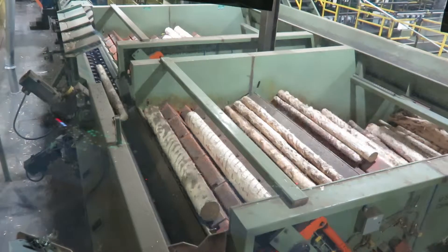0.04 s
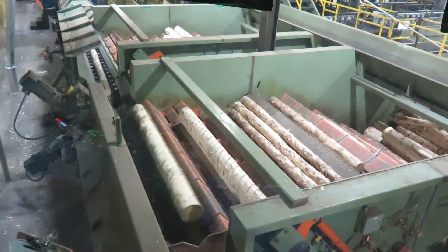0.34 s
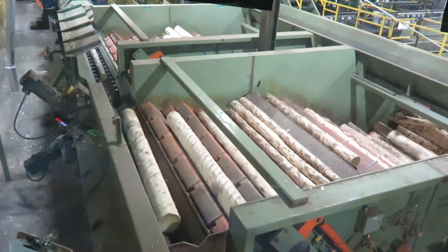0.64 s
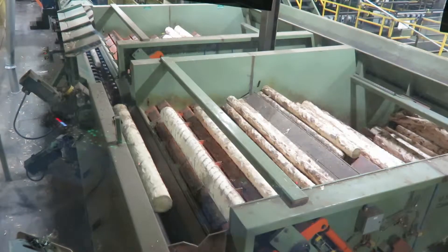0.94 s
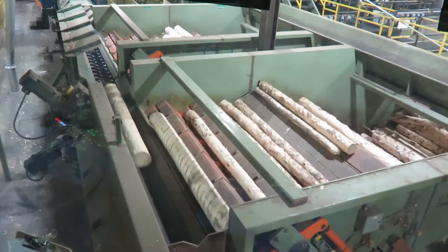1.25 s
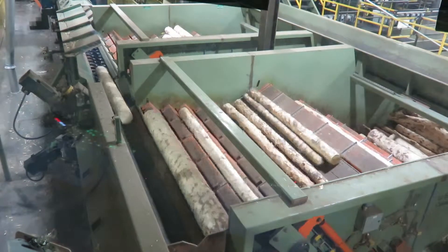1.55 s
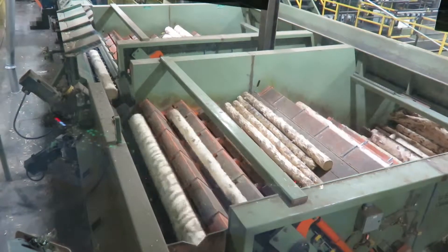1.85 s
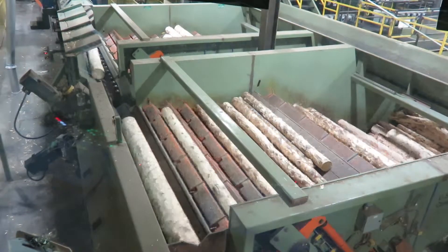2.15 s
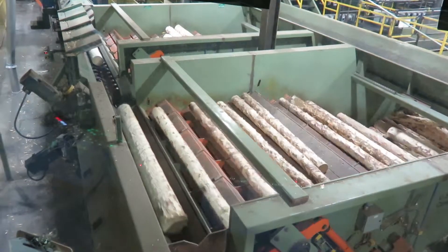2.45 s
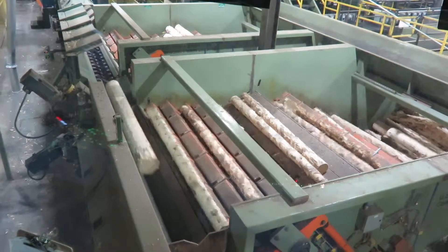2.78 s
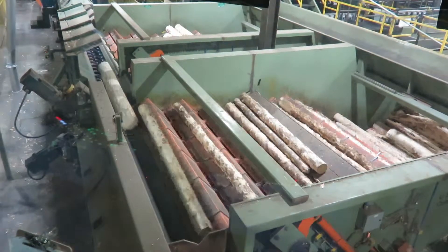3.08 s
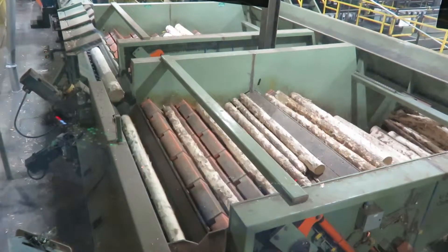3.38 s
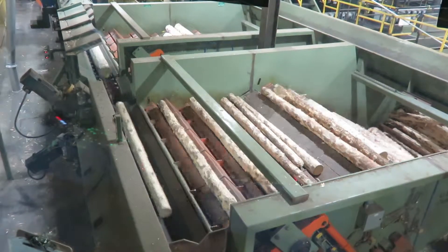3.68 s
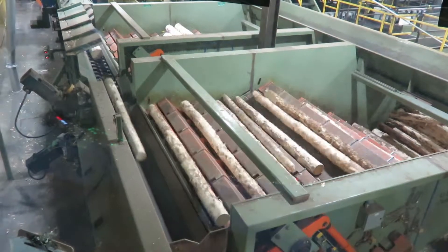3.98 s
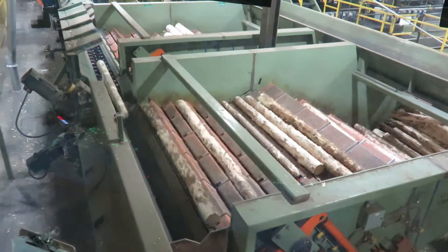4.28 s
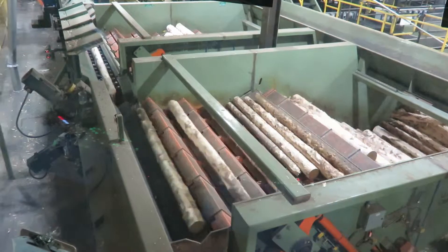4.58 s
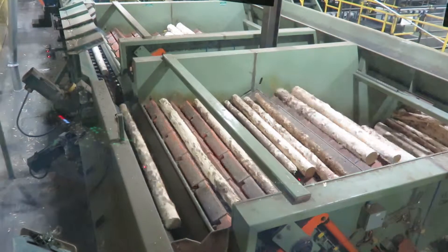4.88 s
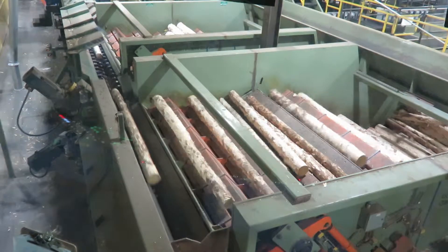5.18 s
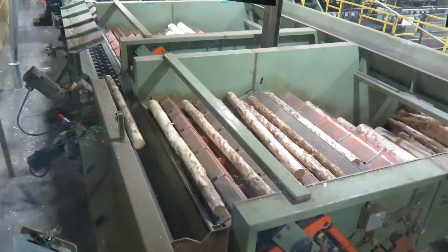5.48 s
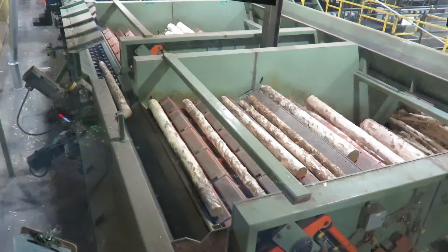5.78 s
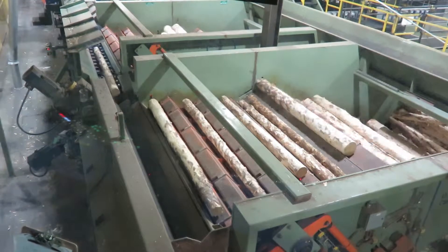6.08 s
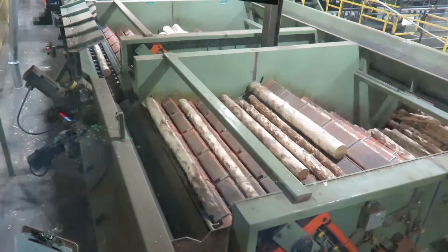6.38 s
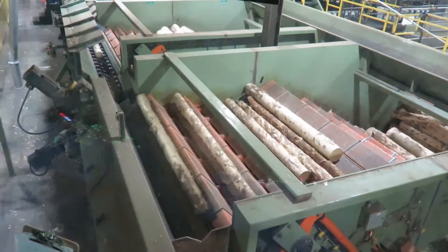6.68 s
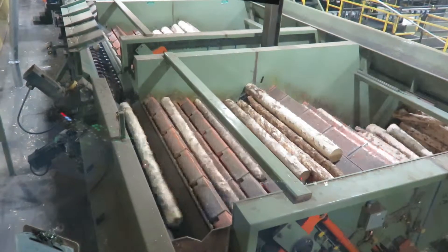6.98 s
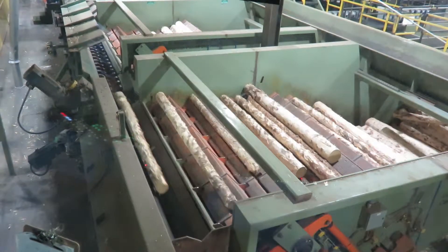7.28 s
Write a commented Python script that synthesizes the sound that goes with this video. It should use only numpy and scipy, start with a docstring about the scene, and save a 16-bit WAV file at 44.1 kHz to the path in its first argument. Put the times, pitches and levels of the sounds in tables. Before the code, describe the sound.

Sawmill machinery rumbles steadily while logs roll and thud in a steel feeder bin and a cutter roars in surges.

```python
"""A steel frame rumbles and logs roll and thud in a bin, in a large, echoing sawmill hall.
A step feeder is lifting them onto a chain conveyor, heard through a close pair of microphones.
Down the line a cutter roars each time it takes a log; its shaft throbs and its head whines under load.
Logs scrape along the trough, and the chain clacks and squeaks now and then.
A few thin ticks sound in the treble, and after each the level dips briefly."""
import sys
import numpy as np
from scipy import signal
from scipy.fft import rfft, irfft
from scipy.io import wavfile
from scipy.ndimage import uniform_filter1d

SR = 44100
rng = np.random.default_rng(int(sys.argv[2]) if len(sys.argv) > 2 else 0)


def digitize_waveform(pressure):
    """Quantize a signal to 16-bit integers and store it at the path in sys.argv[1].

    Rows of a 2-D input are taken as channels; values are limited to [-1, 1].
    """
    field = np.atleast_2d(pressure).T
    bounded = np.clip(field, -1, 1)
    quanta = np.round(bounded * 32767).astype(np.int16)
    wavfile.write(sys.argv[1], SR, quanta)


N = 332514
TIME = np.arange(N) / SR
BINS = np.fft.rfftfreq(N, 1 / SR)
CLOCK = np.arange(0, N / SR, .002)  # coarse time for the envelopes, in seconds

# Resonances of the bin walls, logs and steel plates. Each row: pitch in Hz, width in Hz, relative dB.
WALL_MODES = [(118.3, 9.7, -1.5), (143.1, 12.3, 4.5), (161.4, 6.1, 4), (177.3, 13, 3), (201, 8.8, -5.5)]
LOG_MODES = [(236.4, 12.2, 2), (256, 17, -5.5), (279, 24, -2.5), (327, 31, -6.5), (371, 46, -13.5)]
PLATE_MODES = [(401, 238, 0), (472, 20, -0.5), (534, 47, -0.5), (660, 69, -7), (827, 77, -8)]
# Balance at the microphones. Each row: frequency in Hz, left minus right in dB.
BALANCE = [(60, .2), (125, -.3), (250, -1.4), (500, -1.1), (2000, -.4), (12000, -.4)]
# Thin ticks. Each row: time in seconds, peak in dB, dip that follows in dB.
TICKS = [(.6345, -49, -1.5), (.7573, -42, -2), (2.3426, -42.5, -3), (5.5305, -47, -2), (6.6015, -49, -1),
         (7.4885, -51, -1)]


def gain_of(db):
    """Decibels to amplitude."""
    return 10 ** (np.asarray(db) / 20)


def unit_rms(x):
    """Scales to rms 1."""
    return x / np.sqrt(np.mean(x ** 2) + 1e-20)


def db_at(points, hz):
    """Reads a table of levels on a log-frequency axis."""
    f, db = np.transpose(points)
    return np.interp(np.log(hz + 1), np.log(f + 1), db)


def follow(rows):
    """Each column of a table of curves, at every sample."""
    times, *columns = np.transpose(rows)
    return [np.interp(TIME, times, column) for column in columns]


def add(mix, start, sound):
    """Mixes in a stereo sound, its start given in seconds."""
    part = mix[:, max(round(start * SR), 0):][:, :sound.shape[1]]
    part += sound[:, :part.shape[1]]


def drift(rate_hz):
    """Random wander of rms 1, mostly slower than the given rate."""
    hz = np.fft.rfftfreq(len(CLOCK), CLOCK[1])
    spectrum = rfft(rng.standard_normal(len(CLOCK))) / (1 + (hz / rate_hz) ** 4)
    return np.interp(TIME, CLOCK, unit_rms(irfft(spectrum, len(CLOCK))))


def grain(size, span):
    """Noise of rms 1, smoothed over span points."""
    return unit_rms(uniform_filter1d(rng.standard_normal(size), span))


def ringing(modes, hz):
    """Gain of a set of resonances with steep skirts."""
    return np.sqrt(sum((gain_of(db) / (1 + ((hz - f) / width) ** 2)) ** 2 for f, width, db in modes))


def diffuse(colour, size=N):
    """Coloured noise of rms 1 at two close microphones: alike in the bass, unlike in the treble."""
    # Width of the pair. Each row: frequency in Hz, side relative to mid in dB.
    spread = [(25, -38), (60, -32), (125, -25), (250, -18.3), (500, -16), (1000, -10.4), (2000, -10.5),
              (4000, -5.6), (8000, -1), (14000, -1.2)]
    hz = np.fft.rfftfreq(size, 1 / SR)
    mid, side = rfft(rng.standard_normal((2, size)))
    side *= gain_of(db_at(spread, hz))
    lean = gain_of(db_at(BALANCE, hz) / 2)
    pair = np.array([(mid + side) * lean, (mid - side) / lean])
    return unit_rms(irfft(pair * colour, size))


def steadied(x, span_s):
    """Holds the power of a vibration even over the given span."""
    power = uniform_filter1d((x ** 2).mean(0), int(span_s * SR) + 1)
    power = uniform_filter1d(power, int(span_s * SR / 2) + 1)
    return unit_rms(x / np.sqrt(power + 1e-9))


def blow(t, rise_s, t60):
    """Envelope of a hit: a quick rise, then a decay of 60 dB in t60 seconds."""
    return (1 - np.exp(-t / rise_s)) * gain_of(-60 * t / t60)


def passing(start, length, rise_s, fade_db_per_s):
    """Envelope of a moving log: it builds up, holds, and dies away in the hall."""
    t = CLOCK - start
    return np.sqrt(np.clip(t / rise_s, 0, 1)) * gain_of(-fade_db_per_s * np.maximum(t - length, 0))


def summed_db(gains, base_db):
    """Level in dB, at every sample, of a base plus unrelated sounds on top of it."""
    power = np.interp(TIME, CLOCK, sum(gain ** 2 for gain in gains))
    return 10 * np.log10(gain_of(base_db) ** 2 + power)


def hall_tone(hz, db, wander_rad):
    """A steady tone whose phase wavers on its way through the hall to the microphones."""
    phase = 2 * np.pi * hz * TIME + wander_rad * drift(rate_hz=2.34)
    apart = .18 * np.sqrt(hz / 500) * np.array([[.5], [-.5]])
    return np.sqrt(2) * gain_of(db) * np.sin(phase + apart)


def feeder(load_db):
    """The drive shakes the frame; rolling logs boom, knock and rattle plates the cutter shakes too."""
    # Resonances of the frame. Each row: pitch in Hz, width in Hz, relative dB.
    frame_modes = [(55.9, 4.6, -2.5), (75.4, 7.5, -4.5), (101.3, 12.7, -12)]
    # Effort of the drive. Each row: time in seconds, shaking of the frame in dB.
    drive = [(0, -17.5), (1.1, -19.5), (2.3, -17.5), (3.25, -20), (4.1, -17.5), (4.8, -22), (5.3, -18.5),
             (5.9, -22), (6.6, -19.5), (7.0, -24), (7.54, -18)]
    # Logs rolling down a step. Each row: start and length in seconds, then the boom of the bin walls,
    # the knock of wood and the clatter of plates in dB.
    log_rolls = [(-.05, 0.091, -15, -18.5, -34), (0.33, 0.1, -23, -21, -27), (0.512, 0.24, -19.5, -20, -24),
                 (1.56, 0.33, -28, -22, -28.5), (2.076, 0.25, -29, -21, -34),
                 (2.473, 0.18, -24, -21.5, -35), (2.823, 0.28, -28, -22, -29), (3.21, 0.48, -23, -25, -34),
                 (3.845, 0.2, -23, -27.5, -37), (4.072, 0.41, -22.5, -21.5, -32.5),
                 (4.653, 0.58, -42, -27.5, -44), (5.283, .24, -38, -28, -25), (5.436, 0.3, -22, -24, -29),
                 (5.999, 0.71, -23.5, -39.5, -38), (6.35, 0.27, -23, -23, -34),
                 (6.636, 0.24, -28, -20, -31.5), (7, .15, -23, -28, -29.5), (7.388, .17, -25, -21, -28.5)]
    rolls = [passing(start, length, rise_s=.027, fade_db_per_s=72) * gain_of(levels)[:, None]
             for start, length, *levels in log_rolls]
    booms, knocks, clatters = zip(*rolls)
    parts = [(frame_modes, follow(drive)[0]),
             (WALL_MODES, summed_db(booms, base_db=-22)),  # logs keep shifting between rolls
             (LOG_MODES, summed_db(knocks, base_db=-25.5)),
             (PLATE_MODES, summed_db(clatters, base_db=-13 + .48 * load_db))]
    out = np.zeros((2, N))
    for modes, db in parts:
        level = gain_of(db + .4 * drift(rate_hz=12))
        out += level * steadied(diffuse(ringing(modes, BINS)), span_s=.1)
    return out


def cutter_load():
    """Roar and chip levels in dB: each log bites in, loads the knives as its girth changes, and leaves."""
    # Logs in the cutter. Each row: start and length in seconds, final roar and final hiss in dB,
    # climb of the roar in dB per second.
    cuts = [(-.4, 1.01, -28.5, -49, -4.5), (1.135, 1.06, -27, -49, 3), (2.352, 0.33, -37, -54, 2),
            (2.65, 2.01, -27, -49.5, 1.4), (4.616, 0.9, -26, -48.5, 8), (6.0, 0.76, -32.5, -50.5, -0.5),
            (6.747, 0.19, -37, -69, 0), (7.22, 0.34, -36.5, -56, -1)]
    bite_s, idle_roar_db, idle_chips_db = .26, -36, -69
    roar, chips = [], []
    for start, length, roar_db, chips_db, climb in cuts:
        girth_db = climb * np.clip(CLOCK - start - length, -length, 0)
        # The hall holds the roar longer than the hiss.
        roar.append(passing(start, length, bite_s, fade_db_per_s=42) * gain_of(roar_db + girth_db))
        chips.append(passing(start, length, bite_s, fade_db_per_s=58) * gain_of(chips_db + .45 * girth_db))
    return summed_db(roar, idle_roar_db), summed_db(chips, idle_chips_db)


def cutter(load_db, hiss_db):
    """Down the line, knives tear the wood with a fluttering roar, and chips hiss down the chute."""
    # Spectra of the roar and the chips. Each row: frequency in Hz, relative dB.
    roar_spectrum = [(200, 9), (400, -17), (600, 8), (800, -1), (1000, 2.5), (1250, -0.5), (1900, -1),
                     (2400, -3), (2900, -8.5), (3600, -16.5), (5000, -28), (9000, -61.5)]
    chip_spectrum = [(2000, -16), (3500, 4.5), (4500, 4.5), (5800, 2), (7000, -4.5), (8300, -8.5),
                     (10500, -11.5), (13500, -17), (15500, -21)]
    roar = diffuse(gain_of(db_at(roar_spectrum, BINS))) * gain_of(load_db + .56 * drift(rate_hz=21))
    chips = diffuse(gain_of(db_at(chip_spectrum, BINS))) * gain_of(hiss_db + .5 * drift(rate_hz=100))
    return roar + chips


def motors():
    """The unbalanced shaft throbs, the drive drones, the cutter head whines, and far machines whistle."""
    # Throb of the shaft. Each row: time in seconds, relative dB.
    throb = [(0.0, -30), (0.33, -21), (1.8, -31), (1.85, -46), (2.16, -18), (2.48, -28.5), (5.42, -21),
             (5.63, -37), (6.22, -29), (7.54, -25)]
    # Whine of the head. Each row: time in seconds, then harmonics one to three in dB.
    whine = [(0, -24, -41, -45), (.6, -37, -30, -37), (.85, -33, -32.5, -48), (1.3, -30.5, -40.5, -57),
             (2.0, -41, -32, -45), (2.5, -29.5, -39, -47), (3.2, -30.5, -39.5, -46), (4.1, -30.5, -30, -47),
             (4.7, -26.5, -38, -42), (5.45, -26, -26, -40), (5.9, -36, -35, -45), (6.3, -27, -33, -40),
             (7.54, -29, -35.5, -48)]
    # Machines across the hall. Each row: pitch in Hz, level in dB.
    whistles = [(1026, -51.5), (1520, -55), (2363, -56), (2692, -59.5)]
    shaft_hz, drone_hz, head_hz = 29.9, 177.8, 269.17  # near 1 : 6 : 9
    out = hall_tone(shaft_hz, follow(throb)[0] - 1, wander_rad=.078)
    out += hall_tone(drone_hz, -29 + 3 * drift(rate_hz=2), wander_rad=.85)
    for harmonic, db in enumerate(follow(whine), 1):
        out += hall_tone(harmonic * head_hz, db + .9 * drift(rate_hz=7.7), wander_rad=.21)
    for hz, db in whistles:
        out += hall_tone(hz, db + 4.5 * drift(rate_hz=4.8), wander_rad=1)
    return out


def hall_wash(level_db=-28.5):
    """The other machines in the mill reach the microphones as an even wash."""
    # Room tone. Each row: frequency in Hz, relative dB.
    spectrum = [(12, -20), (23, 4), (40, 9), (100, 10.5), (200, -11), (420, -2.5), (600, -17), (800, -19.5),
                (1200, -13.5), (2300, -17.5), (4000, -31.5), (8200, -42.5), (9200, -38.5), (11200, -44),
                (15000, -56)]
    return gain_of(level_db) * diffuse(gain_of(db_at(spectrum, BINS)))


def log_thuds(body_db=-19):
    """A landing log rings the bin and clatters on the plates; its hollow note swells in the hall."""
    # Logs landing on steel. Each row: start in seconds, relative level in dB, note in Hz,
    # relative clatter in dB, the note's t60 in seconds.
    landings = [(.005, -19, 158, -13, .25), (.1, -16, 142, -10, 0.32), (.17, -16.5, 236, -15, .3),
                (.357, -15, 174, -15, 0.42), (.455, -14, 158, -11, 0.39), (.508, -20, 242, -3, 0.24),
                (.553, -8.5, 161, -16, 0.44), (.585, -15, 264, -7, 0.36), (.635, -16, 132, -18, 0.47),
                (.675, -24, 244.5, -10, .4), (.708, -10, 170, -7.5, 0.32), (.765, -16, 148, -22, .55),
                (1.356, -15.5, 148.4, -20, 0.43), (1.55, -17.5, 465, -6, 0.25),
                (1.595, -19, 230, -14, 0.51), (1.625, -21.5, 303.4, -15, 0.52),
                (1.735, -22, 371, -15, 0.53), (1.845, -16.5, 236, -5, 0.38), (1.89, -18, 171, -16, .4),
                (2.075, -13, 156, -17, 0.27), (2.09, -23, 569, -1, .26), (2.15, -17, 293, -10, 0.81),
                (2.52, -17.5, 239, -18, .3), (2.92, -18, 183.5, -10, .4), (2.94, -16, 239, -5, 0.35),
                (3.02, -21, 275, -6, .35), (3.16, -14.5, 189, -9, 0.6), (3.18, -19, 244, -14, .45),
                (3.235, -25, 140, -16, 0.23), (3.291, -14.5, 178, -18, 0.56), (3.46, -16.5, 153, -21, 0.83),
                (3.648, -9.5, 182.2, -17, 0.47), (4.01, -15.5, 143.8, -7, 0.39),
                (4.085, -17.5, 138, -13, 0.32), (4.115, -12.5, 237, -15, 0.35),
                (4.175, -15.5, 207.6, -7, 0.24), (4.272, -23, 240.4, -6, .3), (4.305, -10, 166, -23, 0.26),
                (4.44, -22, 142, -12, .35), (5.456, -10.5, 292, -4.5, 0.24),
                (5.492, -10.5, 151.6, -9, 0.73), (5.51, -15.5, 482, -0.5, 0.38),
                (5.555, -19, 278.8, -14, 0.94), (5.61, -13, 172.6, -18, 0.34), (5.72, -14, 153.5, -18, 0.6),
                (6.309, -12.5, 134.4, -18, .35), (6.355, -16, 177.5, -13, .55),
                (6.43, -12.5, 139, -18, 0.31), (6.502, -13.5, 180.6, -11, .3),
                (6.57, -7.5, 148.4, -20, 0.3), (6.675, -13.5, 143, -18, 0.38),
                (6.70, -11.5, 242.3, -17, 0.45), (6.82, -16, 175.3, -25, 0.56),
                (6.887, -14, 234.7, -16, 0.44), (7.045, -15.5, 245.3, -14, .8),
                (7.451, -10.5, 172, -18, 0.4), (7.47, -14.5, 260, -15, .4)]
    out, t = np.zeros((2, N)), TIME[:SR * 2 // 3]
    rings = np.array([gain_of(db) * np.exp(-np.pi * width * t) * np.sin(2 * np.pi * hz * t)
                      for hz, width, db in WALL_MODES + LOG_MODES])
    plates = ringing(PLATE_MODES, np.fft.rfftfreq(len(t), 1 / SR))
    for start, db, note_hz, clatter_db, t60 in landings:
        scatter = unit_rms(np.interp(t, np.arange(20) / 20, rng.standard_normal(20)))
        phase = 2 * np.pi * (note_hz * t + rng.random()) + .22 * scatter  # echoes bend the phase
        note = np.sqrt(2) * gain_of(2) * np.sin(phase) * blow(t, rise_s=.012, t60=t60)
        body = gain_of(body_db) * rng.uniform(-.87, 1, len(rings)) @ rings  # depends on where it lands
        clatter = gain_of(clatter_db) * diffuse(plates, len(t)) * blow(t, rise_s=.0053, t60=.22)
        lean = gain_of(db_at(BALANCE, note_hz) * np.array([[.5], [-.5]]))
        add(out, start, gain_of(db) * (lean * (note + body) + clatter))
    return out


def frame_jolts():
    """The lifting steps jolt the heavy frame, which swells into one low note, dead centre."""
    # Each row: start in seconds, level at the crest in dB, pitch in Hz, time to swell in seconds.
    jolts = [(0.059, -12, 56.6, 0.035), (.255, -16, 58, .035), (.42, -13, 63.5, 0.042),
             (.565, -12.5, 74.6, .04), (.70, -13.5, 83, 0.036), (0.791, -10.5, 78.4, .04),
             (1.2, -21, 55, 0.052), (1.38, -16.5, 61.5, 0.052), (1.56, -17, 82.6, .04),
             (1.685, -17, 56, .035), (1.755, -16, 69.4, 0.025), (1.975, -13, 82, 0.038),
             (2.085, -16, 70.6, .045), (2.19, -20, 82, 0.036), (2.315, -12.5, 61.5, 0.038),
             (2.449, -20, 55, 0.033), (2.68, -10.5, 60.3, 0.035), (2.895, -16, 58.7, 0.057),
             (3.52, -14, 78, 0.036), (3.772, -19, 82.5, .035), (3.96, -13, 67, 0.03),
             (4.035, -16, 61, 0.07), (4.344, -10, 53.3, .06), (5.49, -9, 79, 0.032), (6.14, -16, 58.3, .06),
             (6.47, -19, 85.4, .07), (6.615, -13, 60.3, 0.04), (7.4, -21.5, 64.8, .06)]
    out, t = np.zeros((2, N)), TIME[:SR // 2]
    for start, db, hz, swell_s in jolts:
        swell = (t / swell_s * np.exp(1 - t / swell_s)) ** 2
        boom = np.sqrt(2) * gain_of(db) * swell * np.sin(2 * np.pi * (hz * t + rng.random()))
        add(out, start, np.array([boom, boom]))
    return out


def chain_clacks(ring_db=1.5, grit_db=3.5, echo_db=-18):
    """Links, flights and logs hit steel with a gritty rattle and an echo; struck wood adds its crack."""
    # Each row: start in seconds, level in dB, tilt in dB per octave, t60 in seconds, relative crack in dB.
    hits = [(.13, -32, -7, .1, -20), (.256, -24.5, .2, .22, -5), (.328, -29.5, -4.5, .11, -3),
            (.53, -40, -.5, .14, -20), (1.442, -35, -.4, .16, -10), (1.892, -30, -7.5, .12, -20),
            (2.072, -24, -2.9, .07, 3), (2.08, -24, -2.6, .14, 4), (2.452, -42.5, 1.5, .14, -20),
            (3.807, -32, -1.3, .14, -12), (4.375, -39.5, -1, .1, -20), (4.515, -29, -8, .12, -20),
            (5.13, -30, -6, .1, -20), (5.157, -31.5, .5, .15, -6), (6.502, -29, -7, .12, -20),
            (6.56, -35.5, -2, .16, -12)]
    # Spectrum of struck steel. Each row: frequency in Hz, relative dB.
    steel = [(400, -15), (1200, -3), (2000, -2), (3300, -5), (4800, -12), (6700, -15.5), (9400, -20),
             (13000, -22.5), (15500, -35)]
    # Resonance of cracking wood. One row: pitch in Hz, width in Hz, relative dB.
    crack_mode = [(3000, 1300, -1.5)]
    out, t, hz = np.zeros((2, N)), TIME[:SR], np.fft.rfftfreq(SR, 1 / SR)
    for start, db, tilt_db, t60, crack_db in hits:
        peaks_db = ring_db * grain(len(hz), span=80)  # each link has fine resonances of its own
        colour = gain_of(db_at(steel, hz) + tilt_db * np.log2((hz + 100) / 5000) + peaks_db)
        colour *= 1 + gain_of(crack_db) * ringing(crack_mode, hz)
        rattle = unit_rms(gain_of(grit_db * grain(SR, span=40))) * blow(t, rise_s=.0025, t60=t60)
        echo = gain_of(echo_db) * blow(t, rise_s=.02, t60=.24)
        add(out, start, gain_of(db) * (rattle + echo) * diffuse(colour, SR))
    return out


def trough_scrapes(slips_per_s=45):
    """Bark catches and slips on the trough: uneven little slips, each ringing the steel briefly."""
    # Sliding logs. Each row: start and length in seconds, level in dB.
    slides = [(.27, 0.43, -36), (1.65, 0.46, -40), (3.55, .16, -38.5), (4.18, .47, -41), (6.787, 0.37, -43)]
    # The trough's rasping resonances. Each row: pitch in Hz, width in Hz, relative dB.
    trough_modes = [(1500, 130, 2.5), (1920, 190, 1), (2340, 260, -5)]
    slips = (rng.random(N) < slips_per_s / SR) * rng.uniform(.2, 1, N)
    power = signal.oaconvolve(slips, blow(TIME[:SR // 4], rise_s=.001, t60=.09) ** 2)[:N]
    rasp = unit_rms(np.sqrt(abs(power))) * diffuse(ringing(trough_modes, BINS))
    level = sum(gain_of(db) * passing(start, length, rise_s=.031, fade_db_per_s=150)
                for start, length, db in slides)
    return np.interp(TIME, CLOCK, level) * rasp


def chain_squeaks():
    """A dry link slips on its pin and sings for a moment."""
    # Each row: start in seconds, pitch in Hz, width in Hz, level in dB.
    squeaks = [(.282, 10500, 350, -42), (.325, 12900, 400, -51), (.634, 5030, 70, -39.5),
               (.735, 5020, 40, -42.5), (.787, 6650, 70, -51), (1.07, 5030, 40, -50),
               (1.165, 5020, 40, -44.5), (1.255, 5020, 40, -49.5), (1.447, 6700, 250, -46),
               (5.158, 8300, 400, -47)]
    out, t, hz = np.zeros((2, N)), TIME[:SR // 10], np.fft.rfftfreq(SR // 10, 1 / SR)
    for start, pitch_hz, width_hz, db in squeaks:
        colour = ringing([(pitch_hz, width_hz, 0)], hz)
        tone = steadied(diffuse(colour, len(t)), span_s=.01)
        add(out, start, gain_of(db) * tone * blow(t, rise_s=.0035, t60=.1))
    return out


def ticks(pitch_hz=8000, length_s=.002):
    """A few cycles of a high tone, the same left and right."""
    out, t = np.zeros((2, N)), np.arange(0, length_s, 1 / SR)
    tick = np.hanning(len(t)) * np.sin(2 * np.pi * pitch_hz * t)
    for at, db, _ in TICKS:
        add(out, at - length_s / 2, gain_of(db) * np.array([tick, tick]))
    return out


def level_dips(recover_s=.1):
    """The level drops at each tick and soon comes back."""
    db = sum(dip_db * (CLOCK > at) * np.exp(-abs(CLOCK - at) / recover_s) for at, _, dip_db in TICKS)
    return np.interp(TIME, CLOCK, gain_of(db))


def scene():
    """The whole mill, from where the microphones stand."""
    load_db, hiss_db = cutter_load()
    mill = feeder(load_db) + cutter(load_db, hiss_db) + motors() + frame_jolts() + log_thuds()
    mill += chain_clacks() + chain_squeaks() + hall_wash() + trough_scrapes()
    return mill * level_dips() + ticks()


def record(dry):
    """The highest peaks are rounded off, then the top of the treble is cut."""
    ceiling, edge_hz = .95, 14600
    rounded = dry / (1 + (dry / ceiling) ** 8) ** (1 / 8)
    lowpass = signal.firwin(255, edge_hz, window=("kaiser", 9), fs=SR)
    return signal.oaconvolve(rounded, lowpass[None], "same")


dry = scene()
out = record(dry)
digitize_waveform(out)
```